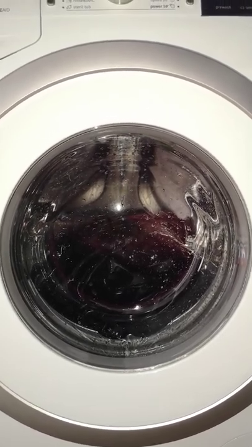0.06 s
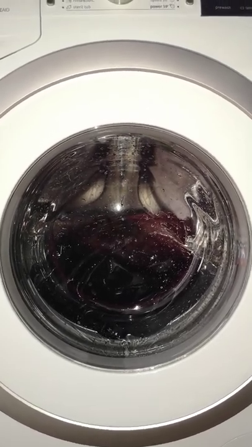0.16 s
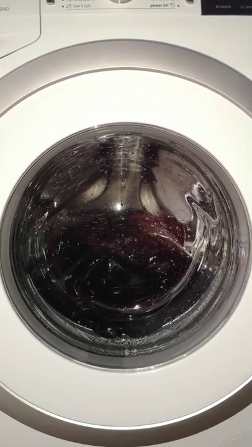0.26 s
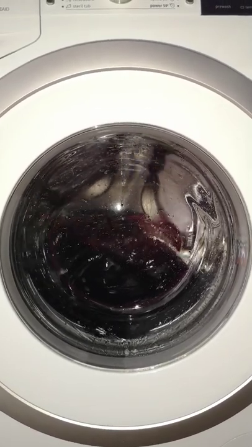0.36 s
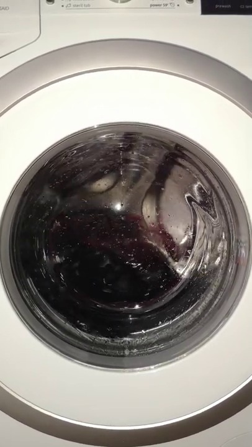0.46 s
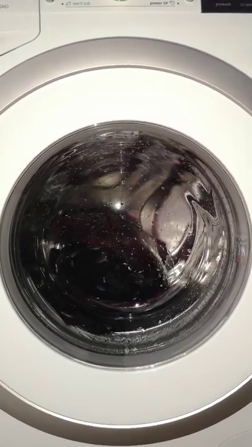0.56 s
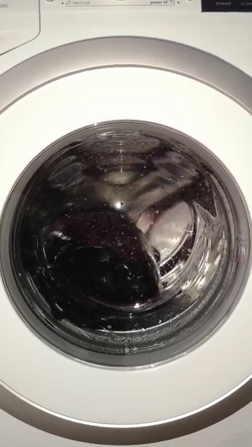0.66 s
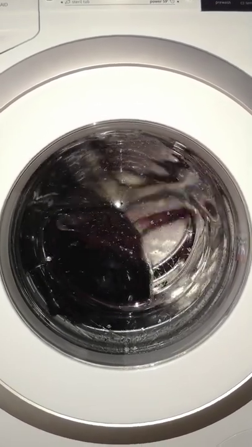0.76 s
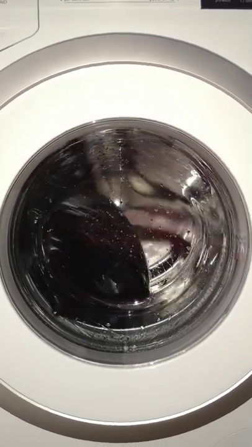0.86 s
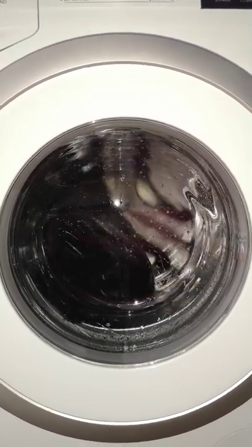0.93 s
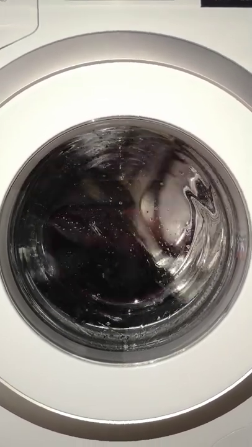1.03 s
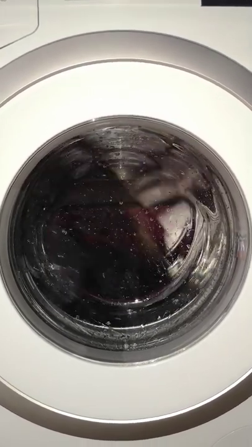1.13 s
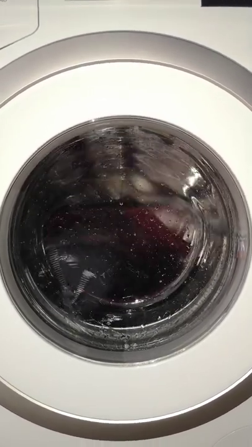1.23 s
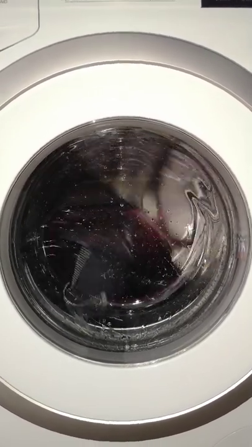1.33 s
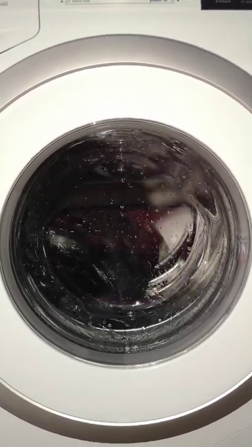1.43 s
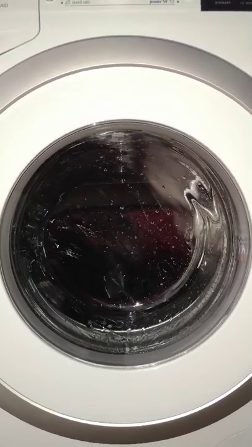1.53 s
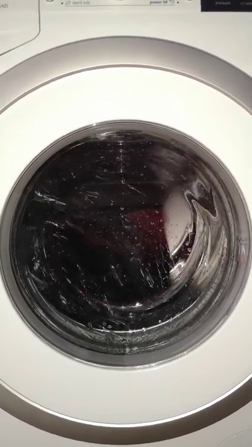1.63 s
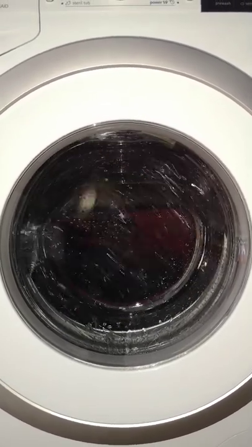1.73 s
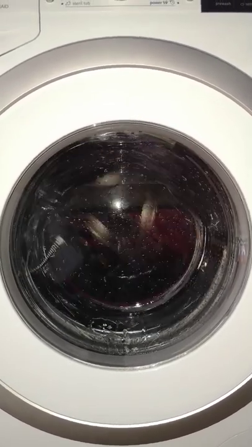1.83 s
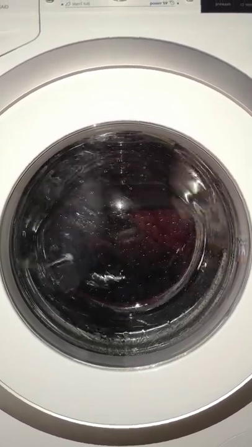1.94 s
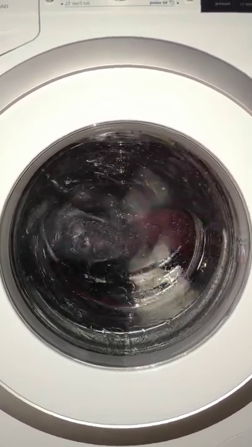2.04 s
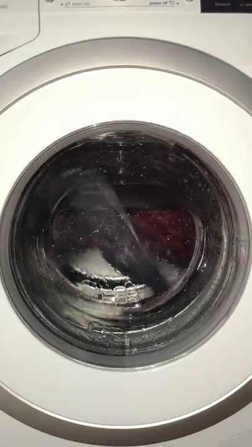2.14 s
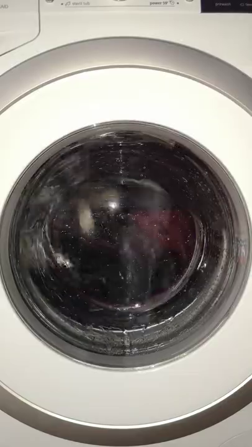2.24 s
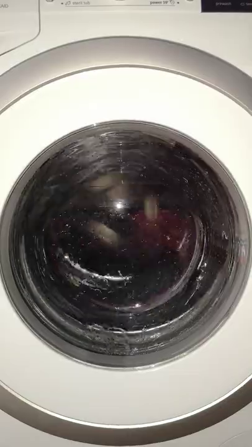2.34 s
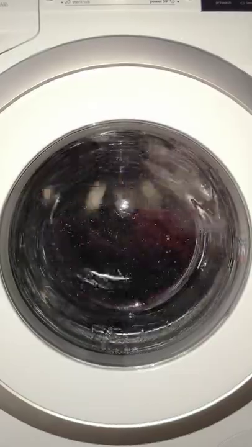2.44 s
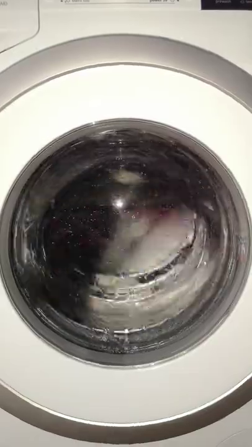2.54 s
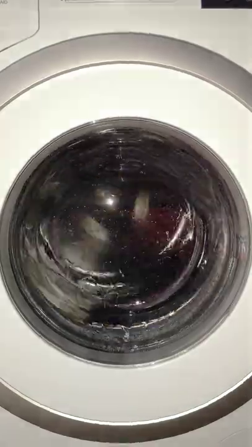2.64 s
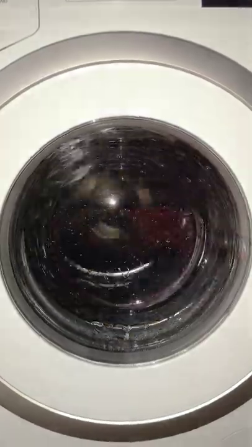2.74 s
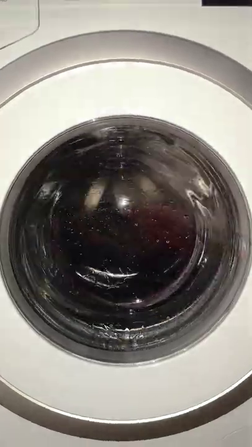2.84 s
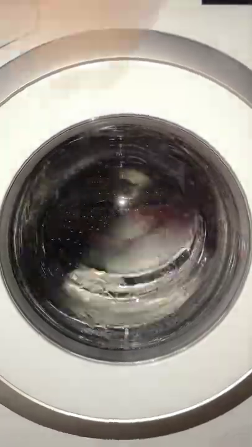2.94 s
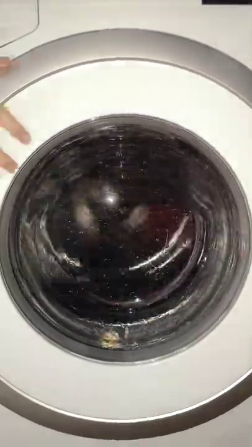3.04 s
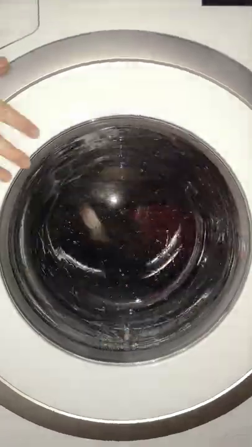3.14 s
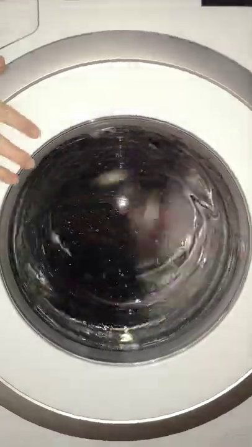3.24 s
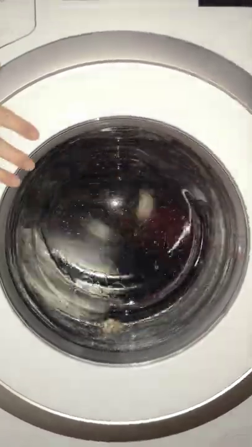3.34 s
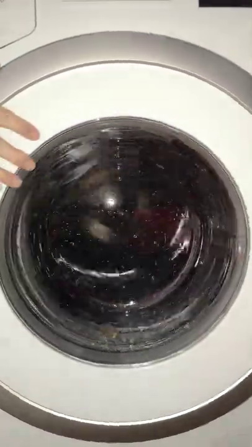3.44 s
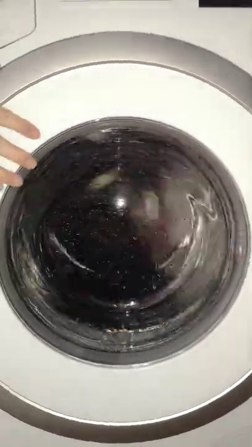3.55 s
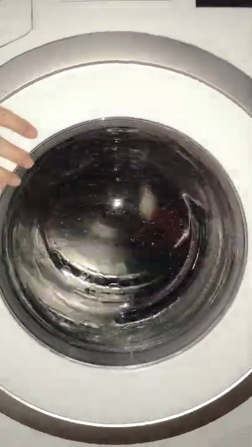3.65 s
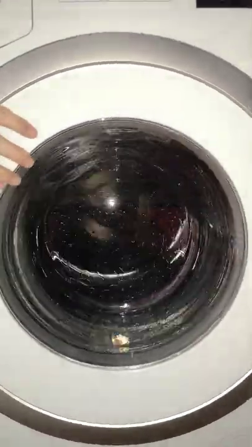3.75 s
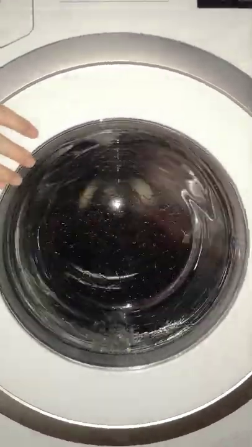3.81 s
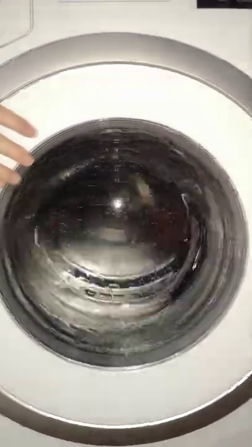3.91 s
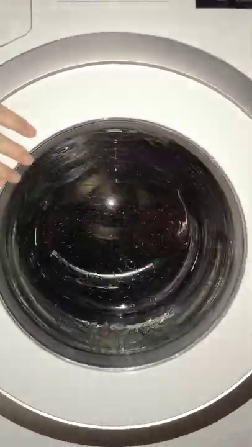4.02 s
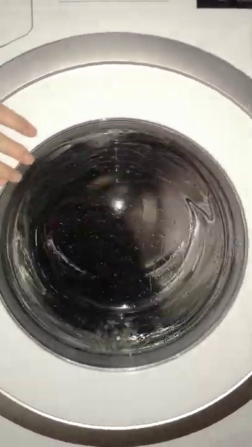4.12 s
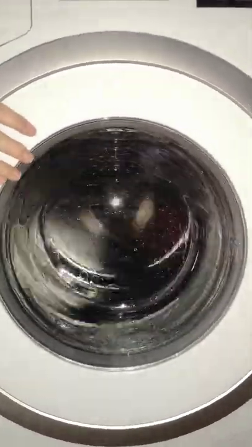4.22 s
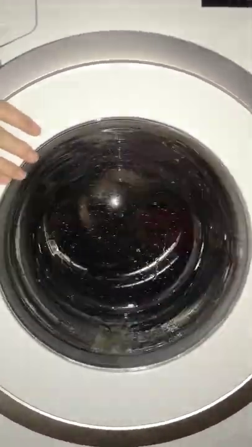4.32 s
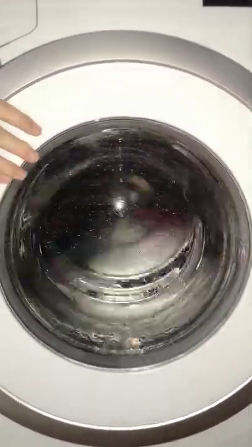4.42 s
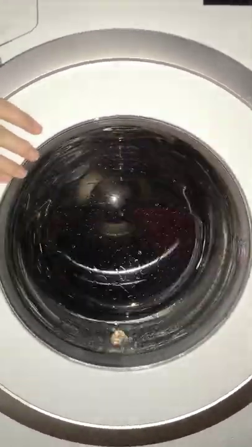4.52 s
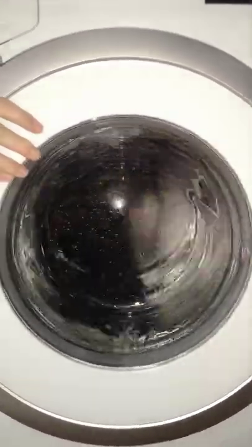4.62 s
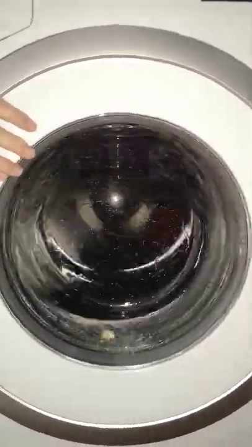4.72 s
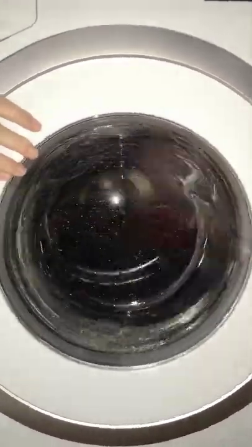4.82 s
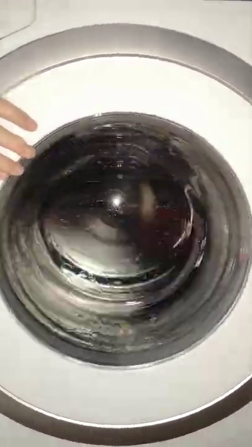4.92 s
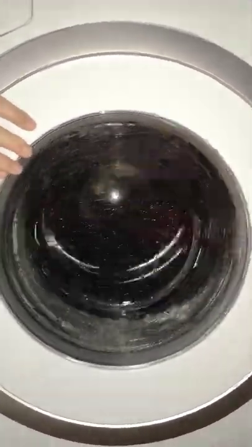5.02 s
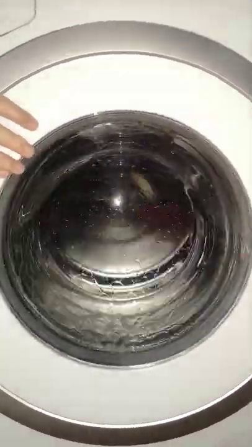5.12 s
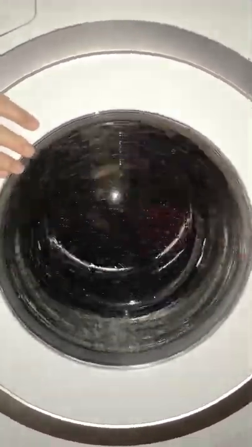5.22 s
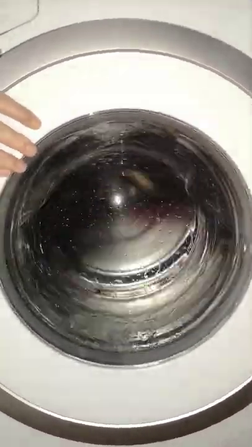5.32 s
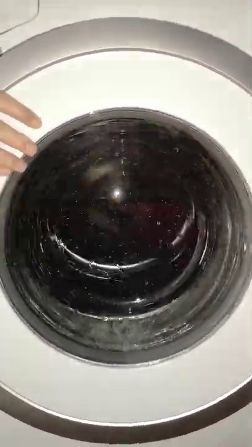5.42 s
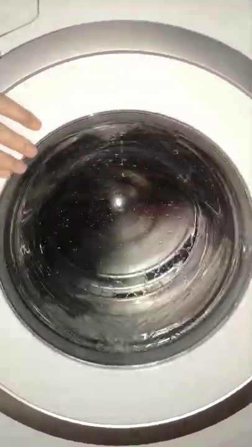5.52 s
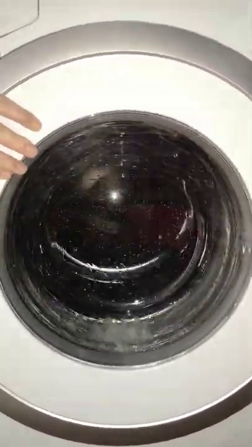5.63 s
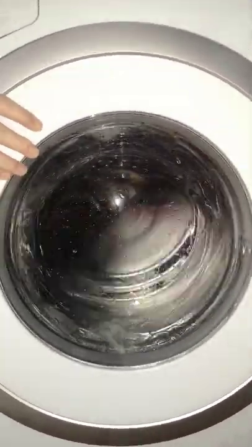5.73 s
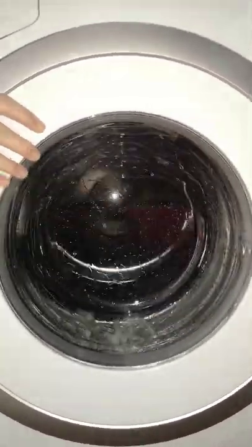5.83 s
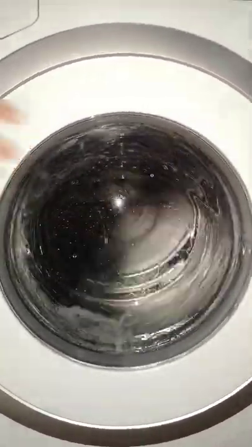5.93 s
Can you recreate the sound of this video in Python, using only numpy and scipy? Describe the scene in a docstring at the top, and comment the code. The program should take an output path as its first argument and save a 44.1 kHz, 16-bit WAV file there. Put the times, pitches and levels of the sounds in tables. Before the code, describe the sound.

Close to a washing machine door in a small hard room. Almost silent for a second, then wet cloth begins to churn with ticks and dull clatter. From about three seconds deep thumps and booming rumble swell up, and a loose coin snaps on glass, chinks on steel and bangs the door frame until the end.

```python
"""Washing machine spinning up with a lopsided load

A front-loader's heavy wet laundry rocks the tub, thuds and booms in the cabinet: filtered noise and tone bursts.
Cloth and water churn: coloured noise that follows a drive level. Small parts tick, clatter and clunk inside.
A loose piece of metal, likely a coin, hits door glass, steel drum and door frame: noise bursts ring each part's
modes. A small hard room answers with decaying noise. Table levels are relative; each source sets its own gain."""
import sys
import numpy as np
from scipy import signal
from scipy.fft import rfft, irfft, next_fast_len
from scipy.io import wavfile
from scipy.ndimage import uniform_filter1d, minimum_filter1d, map_coordinates

SR = 44100
rng = np.random.default_rng(int(sys.argv[2]) if len(sys.argv) > 2 else 0)


def to_wav(sig):
    """Store sig (one row per channel, or 1-D mono) as 16-bit WAV at the path in sys.argv[1].

    Samples outside -1..1 are clipped; the rate is SR.
    """
    pcm = np.clip(np.atleast_2d(sig), -1, 1) * 32767
    pcm = np.round(pcm).astype(np.int16)
    wavfile.write(sys.argv[1], SR, pcm.T)  # frames by channels


N = 263277  # length in samples


def amp(db):
    """Level law: decibels to amplitude gain."""
    return 10 ** (np.asarray(db) / 20)


def unit(x):
    """Normalization: scale to rms 1."""
    return x / np.sqrt(np.mean(x ** 2) + 1e-20)


def along(points, hz):
    """Logarithmic frequency scale: interpolate (f/Hz, value) points."""
    f, v = np.transpose(points)
    return np.interp(np.log(hz + 1), np.log(f + 1), v)


def curves(rows):
    """Envelope: linear interpolation in time of each column after t/s."""
    s, *cols = np.transpose(rows)
    t = np.arange(N) / SR
    return [np.interp(t, s, c) for c in cols]


def wobble(rate):
    """Band-limited fluctuation: a smooth curve through random knots, rate a second."""
    knots = rng.standard_normal(int(N * rate / SR) + 4)
    return map_coordinates(knots, [np.arange(N) * rate / SR])


def add(track, s, sound):
    """Superposition: mix a sound into the track at time s."""
    start = max(round(s * SR), 0)
    track[..., start:start + sound.shape[-1]] += sound[..., :N - start]


def follow(drive_db, law):
    """Power-law response: gain of a part under a drive given in dB from full."""
    full_db, growth = law
    return amp(full_db + growth * drive_db)


def resonate(x, part):
    """Minimum-phase resonance: colour and modes filter x, ringing only after their cause."""
    colour, modes = part
    m = 2 * next_fast_len(x.shape[-1])
    hz = np.fft.rfftfreq(m, 1 / SR)
    peaks = sum(db / (1 + (2 * (hz - f) / width) ** 2) for f, width, db in modes)
    cepstrum = irfft(np.log(amp(along(colour, hz) + peaks)))
    # folding the cepstrum onto positive time makes the filter causal
    cepstrum[1:m // 2] *= 2
    cepstrum[m // 2 + 1:] = 0
    response = np.exp(rfft(cepstrum))
    return irfft(rfft(x, m) * response)[..., :x.shape[-1]]


# Coherence of the diffuse field: f/Hz, left-right correlation
COHERENCE = [(60, 1), (125, 0.99), (250, 0.85), (500, -0.58), (1000, 0.14), (2000, -0.17), (5000, -0.081),
             (12000, 0.0023)]


def spread(pair):
    """Interchannel coherence: mid and side weights set the left-right correlation by frequency."""
    m = next_fast_len(N, True)
    correlation = np.clip(along(COHERENCE, np.fft.rfftfreq(m, 1 / SR)), -1, 1)
    turn = np.arccos(correlation) / 2
    mid, side = irfft(rfft(pair, m) * [np.cos(turn), np.sin(turn)], m)[:, :N]
    return np.array([mid + side, mid - side])


def shaken(part, rate, lumpy_db):
    """Forced vibration: noise of wobbling level (rate knots/s) drives a part, levelled to rms 1 over 0.1 s."""
    pushes = rng.standard_normal((2, N)) * amp(lumpy_db * wobble(rate))
    x = resonate(spread(pushes), part)
    power = uniform_filter1d(np.mean(x ** 2, axis=0), size=SR // 10)
    return x / np.sqrt(np.abs(power) + 1e-20)


def strikes(rows, part, rise, t60, alike):
    """Impact excitation: uneven chatter with a rise and decay (s) rings a part's modes."""
    out, t = np.zeros((2, N)), np.arange(SR // 5) / SR
    turn = np.arccos(np.clip(alike, -1, 1)) / 2  # alike is the left-right correlation
    colour, modes = part
    lowest_hz = colour[0][0]
    envelope = (1 - np.exp(-t / rise)) * amp(-60 * t / t60)
    for s, db, pan_db, bright_db in rows:
        grit = amp(np.interp(t, np.linspace(0, t[-1], 100), rng.normal(0, 2.8, 100)))
        chatter = grit * rng.standard_normal((2, len(t))) * envelope
        # a harder contact is brighter, and each spot favours other resonances
        tilted = [(hz, level + bright_db * np.log2(hz / lowest_hz)) for hz, level in colour]
        spot = [(hz, width, level + rng.normal(0, 1.8)) for hz, width, level in modes]
        mid, side = resonate(chatter, (tilted, spot))
        mid, side = unit(mid) * np.cos(turn), unit(side) * np.sin(turn)
        gains = amp([[db + pan_db / 2], [db - pan_db / 2]])
        add(out, s, np.array([mid + side, mid - side]) * gains)
    return out


# Reverberation time of the small hard room: f/Hz, T60/s
ROOM_DECAY = [(200, 0.68), (1000, 0.36), (4000, 0.37), (10000, 0.21), (15000, 0.17)]


def room(x):
    """Reverberation: convolution with noise whose decay time depends on frequency."""
    hz, t, z = signal.stft(rng.standard_normal((2, SR // 2)), SR, nperseg=256)
    decay = amp(-60 * t / along(ROOM_DECAY, hz)[:, None])
    onset = 1 - np.exp(-t / 0.0016)
    tail = signal.istft(z * decay * onset, SR, nperseg=256)[1]
    return signal.fftconvolve(x, tail / np.linalg.norm(tail[0]), axes=1)[:, :N]


# Low background rumble: colour (f/Hz, level/dB); no modes
RUMBLE_PART = ([(10, -6), (30, 1), (50, -3), (80, -15), (160, -24), (260, -25), (450, -35), (1500, -61)], [])
# Hiss of spray, also the background hiss: colour (f/Hz, level/dB); modes (f/Hz, width/Hz, gain/dB)
SPRAY_PART = ([(1500, -19), (3500, 2), (5500, -2.5), (7200, -5.5), (9500, -8), (12000, -14.5),
               (15000, -29)], [(6850, 270, 6.5)])


def floor():
    """Stationary noise: a faint low rumble and hiss lie under everything."""
    rumble = amp(-70) * shaken(RUMBLE_PART, rate=13, lumpy_db=2.5)
    hiss = amp(-79) * shaken(SPRAY_PART, rate=28, lumpy_db=1.4)
    return rumble + hiss


# How hard the lopsided load shakes the machine: t/s, level/dB
SHAKE_DRIVE = [(0, -74), (1.03, -54.5), (1.27, -38), (1.98, -39), (2.2, -42), (2.8, -36), (3.2, -17),
               (4.0, -14.5), (4.3, -9), (4.72, -13.5), (5.08, -10), (5.26, -13), (5.58, -11.5),
               (5.78, -21.5), (5.97, -12.5)]
# Drumming of the cabinet panels: t/s, level/dB
DRUMMING_DRIVE = [(0.0, -94), (0.85, -81), (1.41, -52), (1.8, -51.5), (2.11, -58.5), (3.03, -47.5),
                  (3.18, -41), (4.42, -32.5), (4.6, -36), (5.35, -34.5), (5.72, -43.5), (5.97, -41)]
# Tub rocking on its springs: colour (f/Hz, level/dB); modes (f/Hz, width/Hz, gain/dB)
SWAY_PART = ([(8, -26), (20, -6), (35, -6.5), (52, 5.5), (65, -22.5), (120, -67.5)], [(44.25, 21, 27)])
# Thrum of the tub: colour (f/Hz, level/dB); modes (f/Hz, width/Hz, gain/dB)
TUB_PART = ([(30, -48.5), (55, -21.5), (72, 1), (90, -1), (105, -12.5), (150, -42), (300, -77)],
             [(79.3, 15, 12.4)])
# Boom in the box: colour (f/Hz, level/dB); modes (f/Hz, width/Hz, gain/dB)
BOOM_PART = ([(50, -50), (80, -16.5), (100, 2.5), (125, 7), (165, -6), (200, -13), (300, -43.5),
              (600, -87)], [(120.3, 6.4, 5.7), (161.2, 18, 9.8)])
# Cabinet panels: colour (f/Hz, level/dB); modes (f/Hz, width/Hz, gain/dB)
PANEL_PART = ([(120, -23.5), (200, -3.5), (290, -4.5), (400, -13.5), (550, -24.5), (900, -43.5),
               (2000, -82)], [(241.55, 13, 14), (293, 81, 2), (369, 17, 7.6), (450, 59, 8.6)])
# Response of sway, tub and boom to the shaking: level at full drive/dB, growth/(dB per dB)
SWAY_RESPONSE = (-23, 1.14)
TUB_RESPONSE = (-21.5, 1.08)
BOOM_RESPONSE = (-22.5, 1.0)
FULL_SHAKE_DB = -13


def cabinet():
    """Unbalance excitation: the load rocks the tub on its springs and booms in the box; panels drum."""
    shake_db = curves(SHAKE_DRIVE)[0] - FULL_SHAKE_DB
    sway = follow(shake_db, SWAY_RESPONSE) * shaken(SWAY_PART, rate=12, lumpy_db=5.5)
    tub = follow(shake_db, TUB_RESPONSE) * shaken(TUB_PART, rate=25, lumpy_db=5)
    boom = follow(shake_db, BOOM_RESPONSE) * shaken(BOOM_PART, rate=35, lumpy_db=4)
    panels = amp(curves(DRUMMING_DRIVE)[0] + 2.5) * shaken(PANEL_PART, rate=44, lumpy_db=3)
    tumble = amp(2 * wobble(14))  # the laundry's uneven fall varies all four together
    return tumble * (sway + tub + boom + panels)


# Rubbing of wet cloth in the drum: t/s, level/dB
RUB_DRIVE = [(0.0, -84.5), (0.93, -77.5), (1.13, -62), (1.41, -48.5), (1.58, -53.5), (2.04, -57),
             (2.68, -51), (2.83, -48), (3.84, -45), (4.11, -45), (4.26, -41.5), (4.44, -46.5),
             (5.29, -43.5), (5.57, -46.5), (5.97, -46)]
# Churning cloth and water: colour (f/Hz, level/dB); modes (f/Hz, width/Hz, gain/dB)
CHURN_PART = ([(200, -1.5), (550, -3.5), (850, -2), (1350, -5.5), (2400, -10), (3300, -21), (5000, -44.5),
               (10000, -44)], [(700, 31, 1.9), (896, 74, 5.6), (1960, 32, 2.5)])
# Drum, rattled and struck: colour (f/Hz, level/dB); modes (f/Hz, width/Hz, gain/dB)
DRUM_PART = ([(150, -14.5), (420, 3), (650, 0.5), (1100, 7), (2100, 0.5), (2700, -1), (3300, -5.5),
              (5500, -13), (7200, -14.5), (11000, -24), (15000, -39.5)], [(1597, 150, 9.3),
              (1953, 440, 6.3), (2480, 640, 3.9)])
# Singing steel shell: colour (f/Hz, level/dB); modes (f/Hz, width/Hz, gain/dB)
SHELL_PART = ([(600, -44), (1300, -17.5), (1560, -6.5), (1850, -10), (2500, -12.5), (4000, -50.5)],
               [(1550, 85, 10)])
# Response of churn, rattles, spray and shell to the rubbing: level at full drive/dB, growth/(dB per dB)
CHURN_RESPONSE = (-43, 0.97)
RATTLE_RESPONSE = (-52, 0.82)
SPRAY_RESPONSE = (-60, 1.3)
SHELL_RESPONSE = (-54, 0.66)
FULL_RUB_DB = -45


def wash():
    """Friction and flow noise: wet cloth slops round the drum with rattles, spray and a singing shell."""
    rub_db = curves(RUB_DRIVE)[0] - FULL_RUB_DB
    churn = follow(rub_db, CHURN_RESPONSE) * shaken(CHURN_PART, rate=62, lumpy_db=1.0)
    rattles = follow(rub_db, RATTLE_RESPONSE) * shaken(DRUM_PART, rate=70, lumpy_db=4)
    spray = follow(rub_db, SPRAY_RESPONSE) * shaken(SPRAY_PART, rate=39, lumpy_db=2.5)
    song = follow(rub_db, SHELL_RESPONSE) * shaken(SHELL_PART, rate=34, lumpy_db=1.5)
    song = song * amp(3.6 * wobble(12))
    return churn + rattles + spray + song


# Soft clunks as the drum takes up the load: t/s, level/dB, left-right/dB, brightness/(dB per octave)
CLUNK_HITS = [(0.257, -55, 0, -2.5), (0.898, -59, -3, 9), (1.064, -65, -9, -9.5), (4.461, -38, -6, -8),
              (5.739, -38, 3, 2)]
# Housing: colour (f/Hz, level/dB); modes (f/Hz, width/Hz, gain/dB)
HOUSING_PART = ([(200, -10), (600, -13.5), (900, 0), (1800, -4), (3500, -22.5), (12000, -61.5)],
                 [(924, 98, 13), (1520, 130, 12)])
# Light ticks of small metal in the load: t/s, level/dB, left-right/dB, brightness/(dB per octave)
TICK_HITS = [(1.269, -40.5, 0, 1.5), (1.9593, -31, 1, 0.5), (2.206, -55, 0, 0), (2.515, -50.5, 0, 7),
             (2.5616, -32, 1, -6.5), (2.8394, -36, 10, -6), (2.9407, -44, 2.5, 0), (3.0754, -43, 6, -7.5),
             (3.2797, -30, 0, 5), (3.3328, -43.5, 4, 1), (3.4346, -47, -2, -1)]
# Small metal piece: colour (f/Hz, level/dB); modes (f/Hz, width/Hz, gain/dB)
TRINKET_PART = ([(400, -26), (1500, -4.5), (2600, -3.5), (5500, 2), (9500, -3), (15000, -10.5)],
                 [(2600, 240, 15), (3580, 150, 7.2), (4470, 110, 7.6), (5270, 160, 12), (6130, 320, 3.9),
                 (7050, 490, 8.7), (9550, 400, 6)])
# Duller clatter inside the drum: t/s, level/dB, left-right/dB, brightness/(dB per octave)
CLATTER_HITS = [(1.425, -44, 2, -2), (1.442, -30.5, -4, -5), (1.46, -42, 8, -11), (1.545, -42.5, 0, -1),
                (1.622, -39, 1, -1), (1.647, -22.5, -1, 0.5), (1.667, -30, -3, -0.5),
                (1.689, -34.5, -10, -6.5), (1.709, -37, -2, -8.5), (2.304, -33.5, -1.5, -3),
                (2.343, -37.5, -4, -2.5), (2.367, -38.5, -1, -3.5), (2.842, -38, -2, -1.5),
                (3.225, -34.5, 3.5, 1.5), (3.283, -30.5, 0.5, -5.5), (3.434, -31, 1, -2),
                (3.741, -17.5, 0, 0.9), (4.292, -14.5, 0, 5), (4.309, -20, -2, -4), (4.332, -36, 0.5, -3.5)]


def knocks():
    """Direct and reverberant sound: ticks and muffled blows behind the door, partly by way of the room."""
    clunks = amp(-16.0) * strikes(CLUNK_HITS, HOUSING_PART, rise=0.0039, t60=0.045, alike=0.236)
    ticks = amp(-22.5) * strikes(TICK_HITS, TRINKET_PART, rise=.0003, t60=0.036, alike=0.25)
    clatter = amp(-19) * strikes(CLATTER_HITS, DRUM_PART, rise=0.0021, t60=0.072, alike=0.12)
    reverberant = amp(-5.0) * room(amp(-1.0) * ticks + clatter + clunks)
    return ticks + clatter + clunks + reverberant


# The tub bumps the side panels: t/s, level/dB, left-right/dB, brightness/(dB per octave)
BUMP_HITS = [(2.478, -32.5, -2, -9.5), (4.447, -10.5, 0, -4.5), (4.49, -20, -1.5, -4)]
# Coin on the door frame: t/s, level/dB, left-right/dB, brightness/(dB per octave), coin's own ping/dB
COIN_FRAME_HITS = [(4.065, -9.5, 0, -1.95, -37), (4.844, -13.5, -2, -0.5, -23.5),
                   (5.073, -10.5, -1.5, -0.2, -31), (5.315, -10.5, -2, -1, -28)]


def bumps():
    """Impact-excited plates: panels boom when the tub bumps them, and at each bang on the door frame."""
    direct = amp(-18.5) * strikes(BUMP_HITS, PANEL_PART, rise=0.0038, t60=0.095, alike=0.78)
    jolts = [(s, db, 0, -9) for s, db, *_ in COIN_FRAME_HITS]
    return direct + amp(-23) * strikes(jolts, PANEL_PART, rise=.003, t60=0.14, alike=0.66)


# The load lands on the tub: t/s of the swell's peak, level/dB, pitch of the push f/Hz
LANDINGS = [(2.544, -33, 50), (2.662, -25.5, 81), (2.886, -13, 76), (2.985, -21.5, 77), (3.121, -14.5, 94),
            (3.19, -9, 102), (3.24, -11, 119), (3.29, -15, 78), (3.38, -8.5, 82.5), (3.438, -1, 87.6),
            (3.558, -3, 101.5), (3.585, -5.5, 98), (3.675, -8, 77), (3.763, 0, 90.5), (3.882, 0, 80),
            (4.075, -16, 74), (4.209, -3.5, 76), (4.224, -8, 122), (4.27, -6, 47), (4.366, -2.5, 78),
            (4.493, -10, 84), (4.575, -7.5, 112), (4.63, -7, 74), (4.826, -6, 48), (4.868, -10.5, 118),
            (4.976, -4.5, 98), (5.08, -16, 76), (5.099, -7, 125), (5.321, -5.5, 84), (5.538, -6.5, 47),
            (5.56, -4.5, 78), (5.64, -3, 76), (5.848, -7.5, 81), (5.929, -12, 82)]
# a push swells to its peak over this many cycles; a steeper one is shorter
THUMP_SWELL_CYCLES, THUMP_STEEPNESS = 1.893, 4.76


def thumps():
    """Transient forcing: each landing is a sine push of a few cycles that leaves the tub ringing."""
    out, t = np.zeros(N), np.arange(SR // 5) / SR
    for s, db, hz in LANDINGS:
        swell_s = THUMP_SWELL_CYCLES / hz
        age = t / swell_s
        swell = (age * np.exp(1 - age)) ** THUMP_STEEPNESS
        push = swell * np.sin(2 * np.pi * hz * t)
        add(out, s - swell_s, amp(db - 3.5) * push)
    return out + amp(-17.5) * resonate(out, TUB_PART)


# Coin on the door glass: t/s, level/dB, left-right/dB, brightness/(dB per octave)
COIN_GLASS_HITS = [(3.6078, -11.5, -3, -1.5), (4.638, -7.5, -2.5, 3.5), (4.9154, -12.5, -4, 0),
                   (4.9754, -25.5, 1, 0.5), (5.0964, -18, 0.5, -1)]
# Door glass: colour (f/Hz, level/dB); modes (f/Hz, width/Hz, gain/dB)
GLASS_PART = ([(200, -13), (1200, 0.5), (2700, 7), (5500, -3.5), (8000, -3), (12000, -5.5), (15500, -20)],
               [(1583, 69, 18.5), (4290, 200, 7), (5430, 280, 11), (6730, 290, 19.5), (7120, 530, 8),
               (7750, 280, 16), (9240, 300, 14.5)])


def coin_on_glass():
    """Hard impact: a fast rise and short decay make the coin crack on the glass."""
    return amp(-21.5) * strikes(COIN_GLASS_HITS, GLASS_PART, rise=0.00054, t60=0.017, alike=0.49)


# Coin on the steel drum: t/s, level/dB, left-right/dB, brightness/(dB per octave)
COIN_STEEL_HITS = [(3.6162, -12, 1.5, -0.3), (3.9229, -8, -0.5, 0.3), (4.7323, -8.5, -1, -0.5),
                   (4.9503, -10, 0, -1), (5.1853, -11, -2.5, -1.7)]
# Steel drum under the coin: colour (f/Hz, level/dB); modes (f/Hz, width/Hz, gain/dB)
STEEL_PART = ([(200, -17), (800, -2.5), (2600, 3.5), (8000, 1.5), (10000, 7), (13000, 4.5), (15500, -10.5)],
               [(5240, 300, 4.8), (9900, 230, 9.6), (10670, 540, 17.7), (11280, 410, 6.5), (12000, 220, 15),
               (14780, 510, 26.4)])


def coin_on_steel():
    """Repeated contact: the coin grazes the steel 4.5 ms before it lands with a chink."""
    landing = amp(-20.0) * strikes(COIN_STEEL_HITS, STEEL_PART, rise=0.0018, t60=0.02, alike=.3)
    grazes = [(s - .0045, db, pan, bright) for s, db, pan, bright in COIN_STEEL_HITS]
    return landing + amp(-29.5) * strikes(grazes, STEEL_PART, rise=.002, t60=0.061, alike=.3)


# Door frame: colour (f/Hz, level/dB); modes (f/Hz, width/Hz, gain/dB)
FRAME_PART = ([(120, 10.5), (500, -2.5), (700, 9.5), (950, 13.5), (1300, 10.5), (1700, 8), (2700, 6.5),
               (4500, -0.5), (7200, -3.5), (9000, -6), (15000, -4.5)], [(734, 116, 5.4), (929, 150, 9),
               (1220, 63, 5.8), (1550, 54, 7.6), (2775, 75, 7.2), (7130, 250, 7.7)])


def coin_on_frame():
    """Modal ringing of the struck body: the coin bangs on the frame."""
    bangs = [row[:-1] for row in COIN_FRAME_HITS]
    return amp(-18.5) * strikes(bangs, FRAME_PART, rise=0.0019, t60=0.034, alike=0.19)


# The coin itself: colour (f/Hz, level/dB); modes (f/Hz, width/Hz, gain/dB)
COIN_PART = ([(9000, -48), (13000, -21.5), (14500, -5.5), (16000, -8.5)], [(14700, 820, 10)])


def coin_ping():
    """Modal ringing of the striker: the coin's own high ping at each bang on the frame."""
    pings = [(s, db, -4, 0) for s, *_, db in COIN_FRAME_HITS]
    return amp(-10.5) * strikes(pings, COIN_PART, rise=.0005, t60=0.023, alike=0.34)


def coin():
    """Direct and reverberant sound: the coin's hits and the room's answer to them."""
    bright = coin_on_glass() + coin_on_steel() + coin_ping()
    frame = coin_on_frame()
    return bright + frame + amp(-6.5) * room(bright) + amp(-7.0) * room(frame)


def scene():
    """Superposition: the whole machine, heard from just in front of the door."""
    return floor() + cabinet() + wash() + knocks() + bumps() + thumps() + coin()


# Treble balance of the two microphone ports: f/Hz, left minus right/dB
PORT_BALANCE = [(3000, -0.5), (7000, 2), (11000, 1.5), (14000, -5)]
TOP_HZ = 15400  # upper band limit


def record(dry):
    """Transduction: ports of unequal treble, a look-ahead limiter on the peaks, then a steep band limit."""
    m = next_fast_len(N + SR // 2, True)
    hz = np.fft.rfftfreq(m, 1 / SR)
    soft_ends = signal.windows.tukey(N, .002)
    port_gains = amp(np.outer([.5, -.5], along(PORT_BALANCE, hz)))
    ports = irfft(rfft(dry * soft_ends, m) * port_gains, m)[:, :N]
    needed = 1 / np.maximum(np.abs(ports).max(axis=0) / .9, 1)
    held = minimum_filter1d(needed, size=SR // 200)
    gain = uniform_filter1d(held, size=SR // 200)
    band = 1 / (1 + (hz / TOP_HZ) ** 80)
    return irfft(rfft(ports * gain, m) * band, m)[:, :N]


dry = scene()
out = record(dry)
to_wav(out)
```